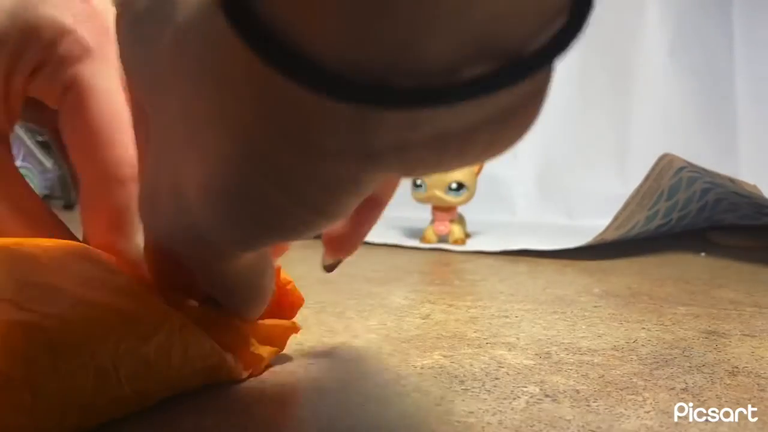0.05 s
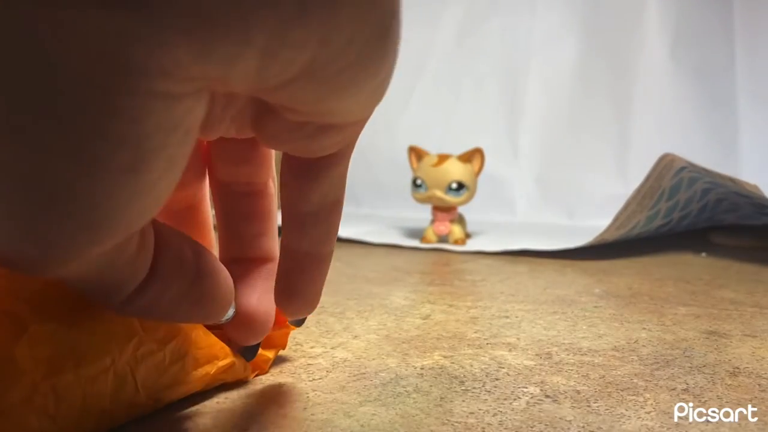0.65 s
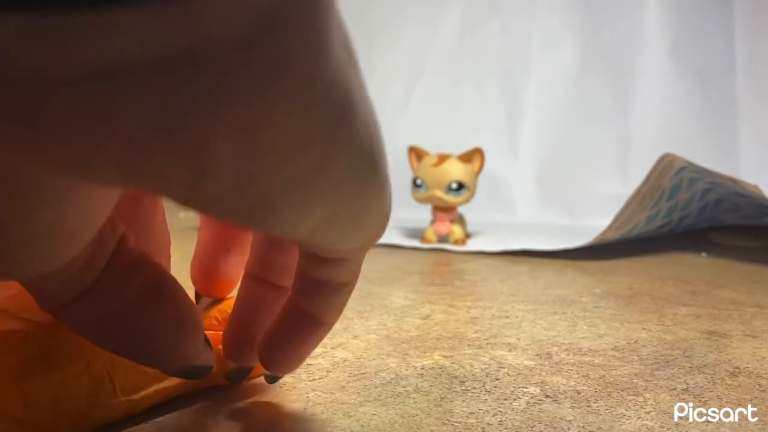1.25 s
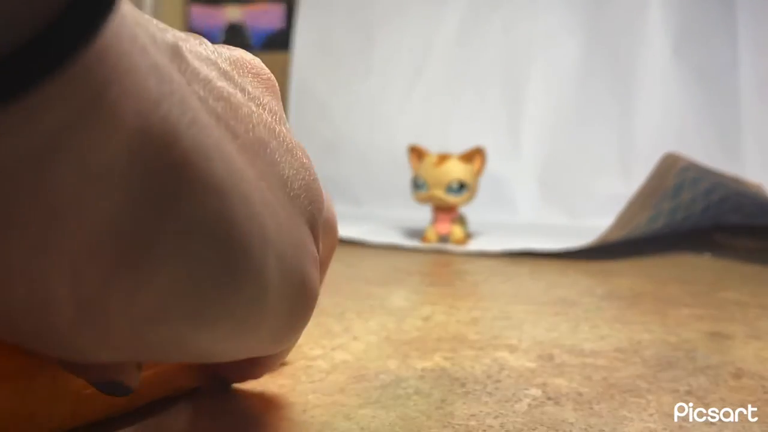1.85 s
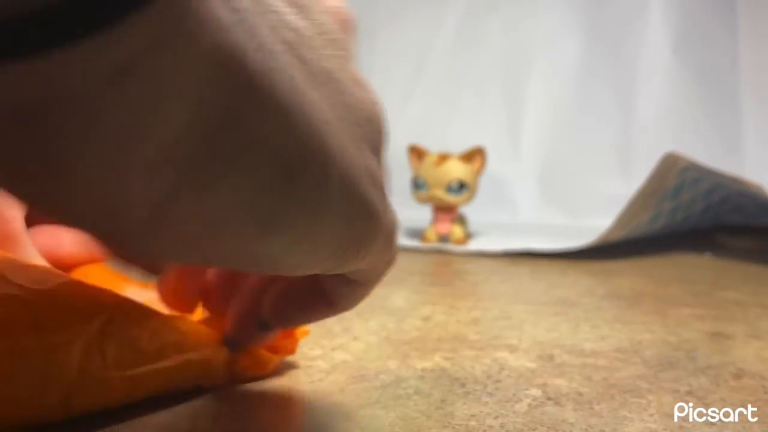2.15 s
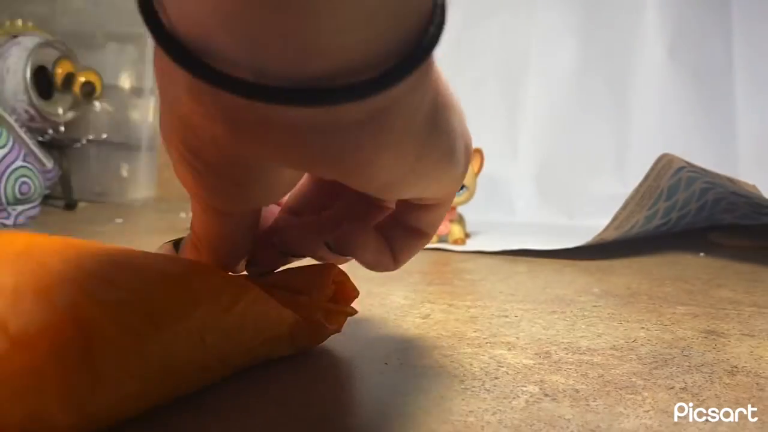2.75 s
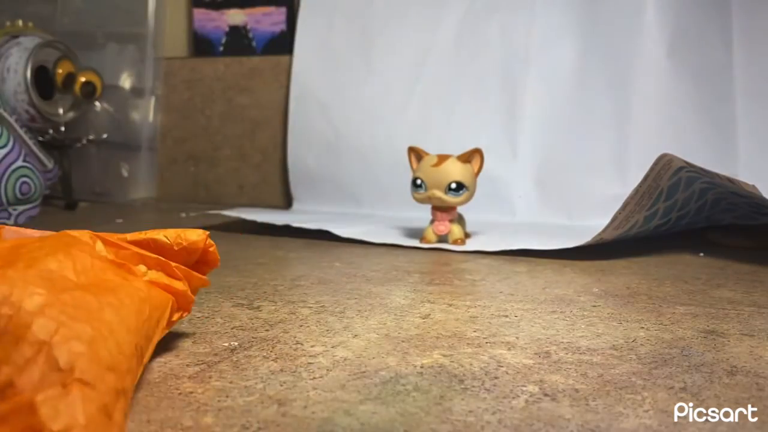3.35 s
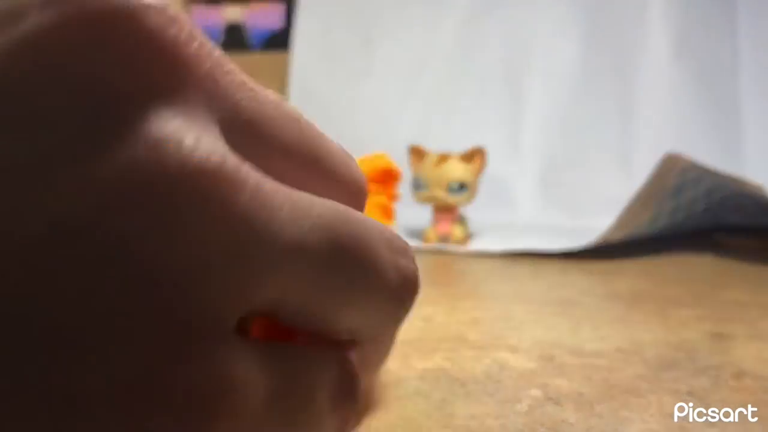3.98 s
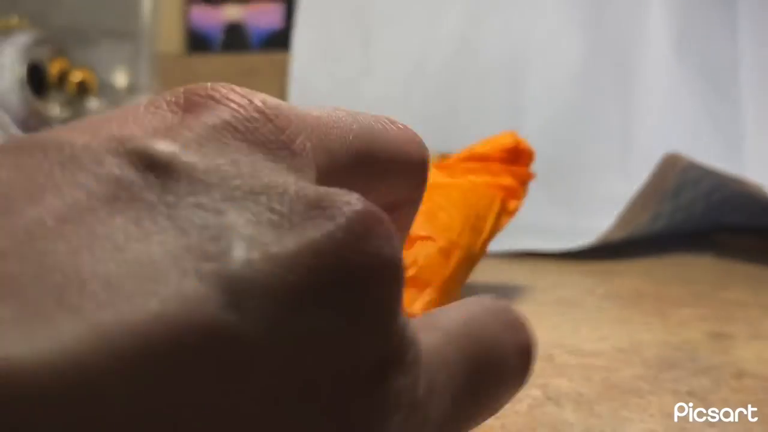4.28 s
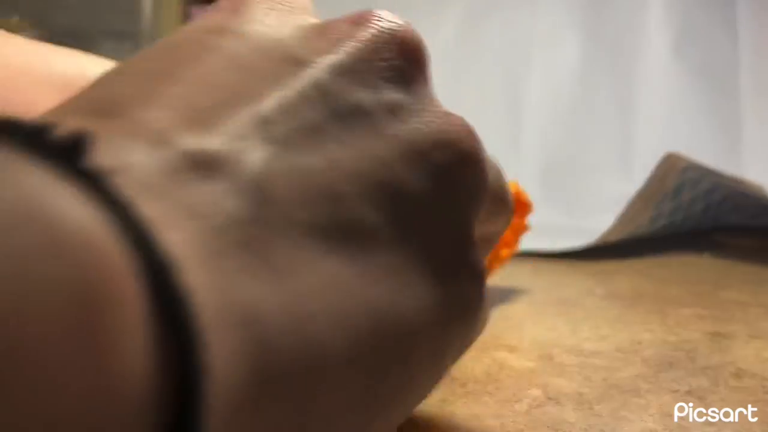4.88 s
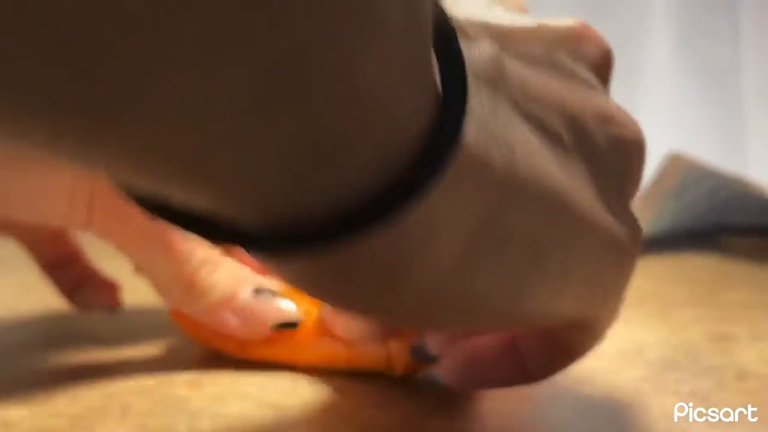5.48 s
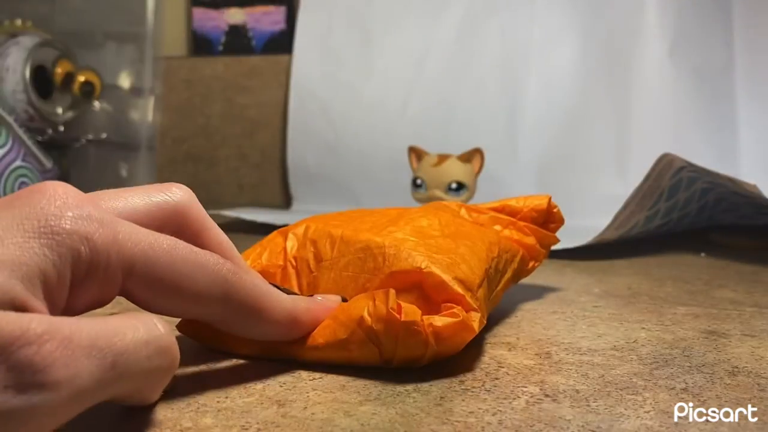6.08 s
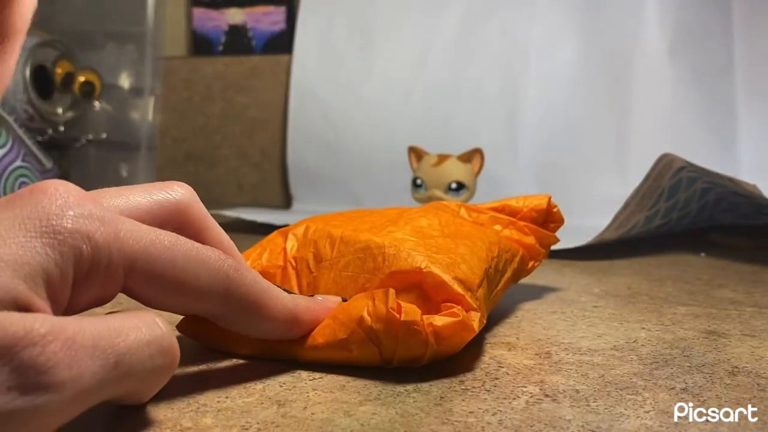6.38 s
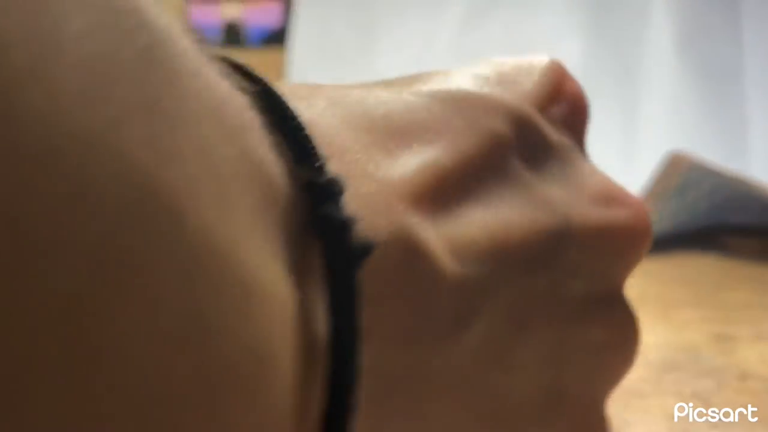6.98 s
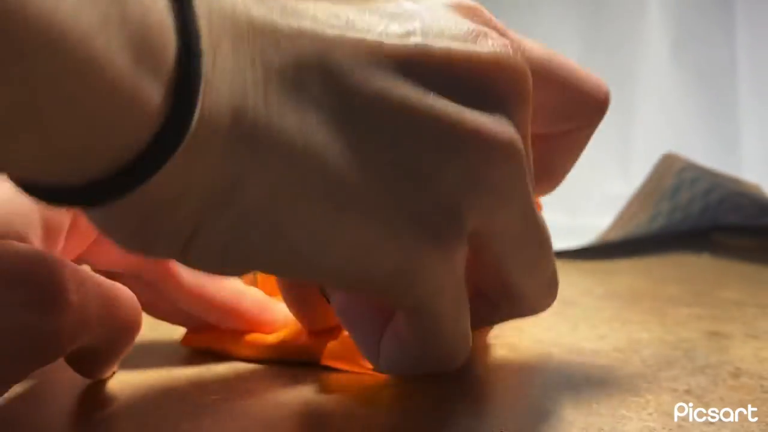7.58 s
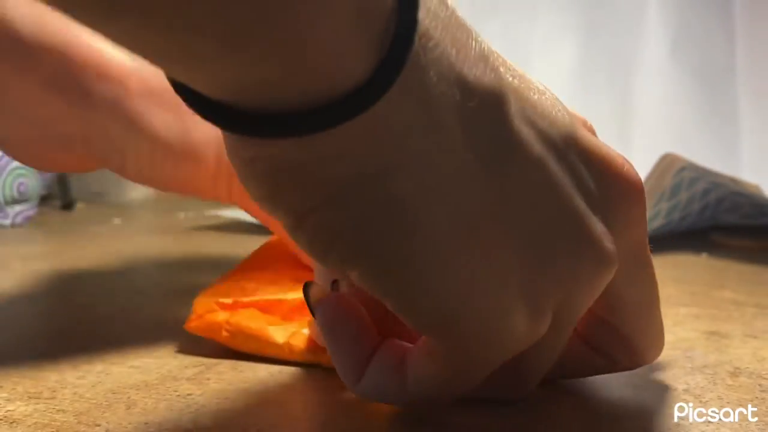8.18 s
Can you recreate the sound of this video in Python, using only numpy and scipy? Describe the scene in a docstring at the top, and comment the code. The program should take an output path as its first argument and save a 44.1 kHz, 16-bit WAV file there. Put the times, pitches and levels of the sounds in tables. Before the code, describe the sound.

Close by, hands fold tissue paper round a small parcel on a table, making uneven hissing rustles and bursts of crinkling. A hard knock, sharp nail taps and soft fingertip thuds come near the start. The rustling swells as the parcel slides round with a light scrape. After a brief lull with another knock and two taps, the folding resumes. A faint electric hum lies underneath.

```python
"""Folding tissue paper round a parcel

Close by, hands fold tissue paper round a small parcel on a table. The paper hisses by friction under
the fingers, buckles in bursts of tiny creases and now and then squeaks on itself. Something hard knocks,
fingertips thud on the tabletop, nails strike through the paper, and the parcel is slid round once.
A low electric hum lies under it all."""
import sys
import numpy as np
from scipy import signal
from scipy.fft import rfft, irfft, next_fast_len
from scipy.io import wavfile
from scipy.ndimage import uniform_filter1d, map_coordinates

SR = 44100
rng = np.random.default_rng(int(sys.argv[2]) if len(sys.argv) > 2 else 0)


def unload_wav(signal):
    """Save mono or channel-first audio to the path in sys.argv[1] as 16-bit WAV at rate SR, clipped to [-1, 1]."""
    wavfile.write(
        sys.argv[1],
        SR,
        np.round(np.clip(np.atleast_2d(signal).T, -1, 1) * 32767).astype(np.int16),
    )


N = 362943
TIME = np.arange(N) / SR


def amp(db):
    """Amplitude ratio of a level in decibels."""
    return 10 ** (np.asarray(db) / 20)


def unit(x):
    """Normalisation to rms 1."""
    return x / np.sqrt(np.mean(x ** 2) + 1e-20)


def along(points, hz):
    """Interpolation of (f/Hz, value) points on a logarithmic frequency axis."""
    f, value = np.transpose(points)
    return np.interp(np.log(hz + 1), np.log(f + 1), value)


def wobble(knots_per_s):
    """Slow random modulation: a spline through Gaussian values."""
    knots = rng.standard_normal(int(N * knots_per_s / SR) + 4)
    return map_coordinates(knots, [TIME * knots_per_s])


def filtered(x, response):
    """Linear filtering: the spectrum of x times a complex frequency response."""
    size = next_fast_len(N + 8192)
    return irfft(rfft(x, size) * response(np.fft.rfftfreq(size, 1 / SR)), size)[..., :N]


def coloured(x, spectrum):
    """Spectral shaping by (f/Hz, level/dB) points, at rms 1."""
    return unit(filtered(x, lambda hz: amp(along(spectrum, hz))))


def resonant(x, modes):
    """Modal superposition: x drives damped resonators of alternating sign, at rms 1."""
    def response(f):
        return sum((-1) ** k * amp(db) * 1j * f * width / (centre * centre - f * f + 1j * f * width)
                   for k, (centre, width, db) in enumerate(modes))
    return unit(filtered(x, response))


def swells(rows, exponent, tail=1):
    """Envelope of bursts (t/s, half length/s, level/dB) added in power; tail stretches each decay."""
    power = np.zeros(N)
    for t, half, db in rows:
        near = slice(max(int((t - .15) * SR), 0), int((t + .15) * SR))
        age = (TIME[near] - t) / half
        power[near] += (amp(db) * np.exp(-np.maximum(age / tail, -age * tail) ** exponent)) ** 2
    return np.sqrt(power)


# finger strokes; tension raises the hiss, body adds low rustle, weight deepens that rustle:
# start/s, end/s, level/dB, tension/dB, body/dB, weight/dB
FINGER_STROKES = [(0, 0.19, -42.5, 0, -8.5, -1.5), (0.261, 0.326, -48.5, 0.5, -9, 2),
                  (0.529, 0.713, -51, 4, -3.5, -2), (1.215, 1.655, -50, -2, -4.5, -0.5),
                  (1.69, 2.141, -46, -3.5, -6.5, 2.5), (2.185, 2.376, -50.5, 0, -7.5, -1.5),
                  (2.42, 2.622, -48, -0.5, -4.5, 0), (2.768, 3.188, -41, 2, -7.5, -0.5),
                  (3.232, 3.676, -43.5, 1, -7, 1), (3.697, 4.224, -41, 4, -7.5, -4),
                  (4.257, 4.5, -48.5, 4.5, -8, 1), (4.528, 4.742, -42.5, 4, -7.5, -5),
                  (4.747, 5.266, -40.5, 1, -4.5, -9.5), (5.346, 5.564, -44, 3, -5.5, -9),
                  (5.608, 5.798, -52.5, 0.5, -3, -13), (5.856, 6.065, -61, 0.5, -1.5, 5),
                  (6.557, 6.811, -51.5, 1, -5, -12), (6.975, 7.222, -54.5, 3.5, -4, -4),
                  (7.26, 7.51, -57.5, -1.5, -2.5, -9), (7.591, 7.745, -51.5, 1.5, -1.5, -10),
                  (7.885, 8.218, -47.5, -2.5, -2, -3.5)]
RESTING_DB = -76  # faint hiss under a still hand


def rubbing(attack_s=0.012, release_s=0.022):
    """Envelope of sliding friction: each stroke rises exponentially, holds and decays."""
    power = np.zeros(N)
    for start, end, db, *_ in FINGER_STROKES:
        rise = np.minimum((TIME - start) / attack_s, 0)
        fall = np.maximum((TIME - end) / release_s, 0)
        power += (amp(db) * np.exp(rise - fall)) ** 2
    return np.sqrt(power + amp(RESTING_DB) ** 2)


def grip():
    """Loading of the sheet: tension, body and weight hold through a stroke, then glide to the next."""
    corners = sorted((t, *hold) for start, end, _, *hold in FINGER_STROKES for t in (start, end))
    times, *columns = np.transpose(corners)
    return [np.interp(TIME, times, column) for column in columns]


def buckling(rub, per_second=14, half_s=0.0065, growth=0.36):
    """Envelope of random buckling; it grows more slowly than friction, so firm strokes sound smoother."""
    when, length, strength = rng.random((int(per_second * N / SR), 3)).T
    levels_db = -50 + 4.5 * (2 * strength - 1)
    folds = swells(zip(when * N / SR, half_s * (.5 + length), levels_db), exponent=1.8, tail=1.4)
    moving = np.maximum(rub - amp(RESTING_DB), 0)
    return folds * unit(moving) ** growth


def creases(per_second, spread_db, samples=160):
    """Buckling fibres radiate a dense train of short wave packets, each at its own frequency."""
    when, pitch, strength, phase = rng.random((int(per_second * N / SR), 4)).T
    hz = 100 + 15800 * pitch
    age = np.arange(samples) / SR
    gain = amp(-spread_db * np.log(np.maximum(strength, .02)))
    tones = np.sin(2 * np.pi * (hz[:, None] * age + phase[:, None]))
    packets = gain[:, None] * tones * np.hanning(samples)
    positions = (when * N).astype(int)[:, None] + np.arange(samples)
    return unit(np.bincount(positions.ravel(), packets.ravel(), N)[:N])


def patchy(x, depth_db):
    """Time-varying filtering: as the sheet changes shape, its resonances come and go."""
    spectra = signal.stft(x, nperseg=1024)[2]
    field = uniform_filter1d(rng.standard_normal(spectra.shape), size=5, axis=0)
    field = uniform_filter1d(field, size=6, axis=1)
    return unit(signal.istft(spectra * amp(depth_db * unit(field)), nperseg=1024)[1][:N])


def rustle():
    """Superposition of creases and the friction noise of sliding fibres, at rms 1."""
    fibres = creases(per_second=3000, spread_db=1) + amp(5.5) * rng.standard_normal(N)
    return patchy(fibres, depth_db=2.0)


def spread(x, side_db, left_db):
    """Decorrelation: noise in antiphase widens x, and unequal channel levels lean it to the left."""
    side = amp(side_db) * patchy(rng.standard_normal(N), depth_db=-1.0)
    return np.array([x + side, x - side]) * amp([[left_db], [-left_db]])


# prominent folds; a soft one has more body and less treble: t/s, half length/s, level/dB, softness/dB
PAPER_FOLDS = [(0.04, 0.015, -34.5, -5), (0.12, 0.022, -37.5, 0.5), (0.366, 0.0072, -44, 0.5),
               (0.416, 0.018, -49.5, 4), (0.477, 0.025, -52, 3), (.638, .009, -36.5, -9),
               (.712, 0.0072, -50, -7), (0.788, 0.0074, -54.5, -14), (0.917, 0.018, -51, -2),
               (0.99, 0.0056, -42, -10), (1.098, 0.02, -48.5, -9), (1.157, 0.022, -40, -10.5),
               (1.26, 0.04, -45, 2), (1.313, .015, -45.5, 2), (1.397, 0.016, -41, 4),
               (1.439, 0.03, -42, -2), (1.538, 0.0041, -42, -5), (1.623, 0.0086, -41, -11),
               (1.696, .0175, -42.5, -10), (1.783, .035, -38.5, 2), (1.89, 0.015, -32, 1.5),
               (1.961, 0.016, -42, 4.5), (2.011, .01, -40, -1), (2.104, 0.014, -38.5, 0),
               (2.229, .016, -49.5, -16), (2.285, 0.015, -44, 5), (2.347, 0.013, -35.5, 4.5),
               (2.435, 0.015, -44, 4), (2.586, 0.013, -44.5, 2), (2.689, 0.015, -48.5, 5),
               (2.784, 0.023, -31, 3.5), (2.815, 0.021, -31, 1.5), (2.919, 0.0058, -35.5, 5.5),
               (2.961, 0.036, -32, -3), (3.1, .0145, -34, -5), (3.255, 0.02, -37.5, -3),
               (3.293, 0.033, -33.5, -0.5), (3.409, 0.041, -36.5, 1), (3.58, 0.013, -42, -4),
               (3.857, .0215, -38, -1), (3.956, 0.0096, -37.5, 2), (4.041, 0.021, -35, -4),
               (4.152, 0.0074, -36, 0), (4.208, 0.016, -39, -12), (4.404, 0.011, -44.5, -3),
               (4.776, 0.016, -39.5, -0.5), (4.815, 0.0062, -37, 9.5), (4.927, 0.015, -43, 1),
               (5.512, 0.013, -42.5, -13), (5.565, 0.016, -40, 8.5), (5.673, 0.013, -43.5, -1),
               (5.734, .025, -40, -0.5), (5.786, 0.0087, -46.5, 6.5), (5.867, .006, -52, 1.5),
               (5.967, 0.029, -48, -5), (6.271, 0.014, -50.5, -1.5), (6.306, 0.01, -50.5, -4),
               (6.616, 0.0079, -40, 6), (6.674, 0.016, -40, 1.5), (6.764, 0.0053, -44, -10),
               (6.936, 0.016, -40, -1), (7.025, 0.033, -48.5, 8), (7.076, 0.013, -49, -7),
               (7.185, 0.034, -43.5, -6), (7.274, 0.012, -47.5, 4), (7.347, 0.016, -53, 10),
               (7.426, 0.018, -46, -11), (7.485, 0.009, -41.5, -8), (7.657, 0.0093, -44, 4),
               (7.715, 0.012, -41.5, -5), (7.766, 0.015, -45, -15), (7.881, 0.019, -39, -0.5),
               (7.935, 0.05, -40.5, -0.5), (8.128, 0.019, -34.5, 3)]
# spectral densities of the sheet's five registers: f/Hz, level/dB
DEEP_SPECTRUM = [(40, -3.5), (130, -4.5), (250, 2), (430, 0), (600, 0), (1000, -52)]
BODY_SPECTRUM = [(250, -39), (430, -17), (560, -4), (850, 1.5), (1150, 1), (1600, -0.5), (1850, -6),
                 (3000, -60)]
SLACK_SPECTRUM = [(900, -7), (1500, -17), (1850, -2.5), (2200, 2), (2650, 5.5), (3000, 4), (3300, -10.5),
                  (4500, -57.5)]
TAUT_SPECTRUM = [(2400, -54), (3200, -5), (3550, 1.5), (4300, 2), (5000, 0.5), (7200, -0.5), (7900, -9),
                 (10000, -50)]
TREBLE_SPECTRUM = [(5500, -79), (7100, -12.5), (7700, -4.5), (9000, 4.5), (11000, -.5), (13000, -1),
                   (15800, -3)]


def paper(uneven_db=1.5, treble_per_tension=0.66, treble_per_softness=-0.37):
    """Source and filter: friction, folds and snaps excite the sheet; the grip weights its registers."""
    tension, body, weight = grip()
    rub, snap = rubbing(), snaps()
    handling = np.hypot(rub * amp(uneven_db * wobble(22)), buckling(rub))
    t, half, peak, softness = np.transpose(PAPER_FOLDS)

    def force(fold_db):
        return np.hypot(handling, swells(zip(t, half, peak + fold_db), exponent=1.56, tail=1.04))

    low_force = np.hypot(amp(body) * force(softness), amp(-14) * snap)
    crisp_force = np.hypot(force(0), amp(-9) * snap)
    treble_gain = amp(-3.5 + treble_per_tension * tension)
    treble_force = np.hypot(treble_gain * force(treble_per_softness * softness), snap)
    grain = rustle()
    # the low rustle spreads over the table and reaches the two channels differently
    low = amp(weight - 6) * coloured(spread(rustle(), side_db=-12.5, left_db=2.5), DEEP_SPECTRUM)
    low += amp(-2.5) * coloured(spread(grain, side_db=-1.5, left_db=3.0), BODY_SPECTRUM)
    # tension moves the energy from the slack register to the taut one
    taut_ratio = amp(tension + 3)
    slack = coloured(spread(grain, side_db=-60, left_db=0.13), SLACK_SPECTRUM)
    crisp = (slack + taut_ratio * coloured(grain, TAUT_SPECTRUM)) / np.hypot(1, taut_ratio)
    treble = amp(1) * coloured(grain, TREBLE_SPECTRUM)
    return low_force * low + crisp_force * crisp + treble_force * treble


# partials of the electric hum: f/Hz, level/dB, wavering/dB
HUM_PARTIALS = [(59.2, -53.5, 1.5), (119.2, -60, 1.8)]
# spectral density of the room's rumble: f/Hz, level/dB
RUMBLE_SPECTRUM = [(20, -38), (35, -15.5), (55, -0.5), (75, -5.5), (110, -12), (170, -20.5), (300, -23),
                   (1000, -31.5), (4000, -45), (15000, -47)]


def room(rumble_db=-56.5):
    """Slow amplitude and phase modulation make an electric hum throb over a quiet rumble."""
    hum = np.zeros(N)
    for hz, db, waver_db in HUM_PARTIALS:
        throb = amp(waver_db * wobble(6.5))
        hum += amp(db) * unit(throb * np.sin(2 * np.pi * hz * TIME + 0.22 * wobble(5.1)))
    return hum + amp(rumble_db) * coloured(rng.standard_normal(N), RUMBLE_SPECTRUM)


# hard knocks on the table: t/s, half length/s, level/dB
HARD_KNOCKS = [(.541, 0.01, -24.5), (6.0, 0.0097, -28), (7.335, 0.0063, -38), (7.363, 0.0082, -45)]
# resonances of the hard object: f/Hz, bandwidth/Hz, level/dB
KNOCK_MODES = [(1285, 196, 2), (1940, 280, -3), (2800, 300, -12), (4200, 810, -13.5), (7500, 9600, -26)]


def knocks(left_db=1.0, ring_db=-1):
    """Impact excitation: a hard object chatters on the table; its lowest mode rings wide and leftward."""
    centre = resonant(rng.standard_normal(N), KNOCK_MODES)
    lowest = KNOCK_MODES[:1]
    ring = amp(ring_db) * resonant(resonant(rng.standard_normal((2, N)), lowest), lowest)
    return swells(HARD_KNOCKS, exponent=1.7) * unit(centre + ring * amp([[left_db], [-left_db]]))


# fingertips pressing on the table: t/s, half length/s, level/dB
FINGERTIP_THUDS = [(0.547, 0.0075, -40), (0.658, 0.017, -34), (0.729, 0.0266, -47.5), (1.016, 0.0223, -28),
                   (1.237, 0.016, -45.5), (1.675, 0.0071, -43.5), (1.853, 0.013, -39),
                   (1.931, 0.0157, -42.5), (2.786, 0.0166, -48), (3.29, 0.017, -48), (4.49, 0.01, -44),
                   (5.877, 0.0136, -45.5), (6, 0.028, -40), (6.122, 0.0094, -45.5), (6.439, 0.02, -34.5),
                   (8.129, 0.025, -54.5)]
# modes of the tabletop: f/Hz, level/dB
TABLETOP_MODES = [(92, -10), (120, 3.5), (155, -8.5), (186, -4), (235, -14), (285, -16.5)]


def thuds(detune=0.064):
    """A soft impact excites the low modes of the tabletop, detuned a little by the load of the hand."""
    out = np.zeros(N)
    for t, half, db in FINGERTIP_THUDS:
        near = slice(int((t - .1) * SR), int((t + .1) * SR))
        age = TIME[near] - t
        ring = np.zeros_like(age)
        for hz, mode_db in TABLETOP_MODES:
            loaded_hz = hz * (1 + detune * rng.normal())
            ring += amp(mode_db) * np.sin(2 * np.pi * (loaded_hz * age + rng.random()))
        out[near] += unit(ring) * swells([(t, half, db)], exponent=1.63)[near]
    return out


# nails striking through the paper: t/s, half length/s, scuff lead/s, snap level/dB, ring level/dB
NAIL_STRIKES = [(0.658, 0.011, 0.016, -24, -26), (1.008, 0.01, 0.019, -19.5, -31.5),
                (6.111, .01, 0.0036, -28.5, -46), (6.448, 0.0072, 0.026, -23.5, -23.5)]


def snaps(scuff_half_s=0.013, scuff_db=-15):
    """Envelope of friction, then impact: a nail drags over the paper just before it strikes."""
    scuffs = [(t - lead, scuff_half_s, db + scuff_db) for t, _, lead, db, _ in NAIL_STRIKES]
    strikes = [(t, half, db) for t, half, _, db, _ in NAIL_STRIKES]
    return swells(scuffs + strikes, exponent=1.3)


# joint resonances of nail, paper and table: f/Hz, bandwidth/Hz, level/dB
NAIL_MODES = [(927, 64, -6), (1824, 39, -8), (2320, 170, 1.5), (2835, 50, 1), (3400, 69, 2),
              (4220, 140, -4), (5100, 78, -10), (6420, 89, 1), (7150, 120, -20), (10000, 950, 1)]


def nail_taps():
    """Resonance after impact: nail, paper and table ring together for a moment."""
    envelope = swells([(t, half, db) for t, half, *_, db in NAIL_STRIKES], exponent=1.12)
    return envelope * resonant(rng.standard_normal(N), NAIL_MODES)


# paper squeaking on paper: t/s, half length/s, level/dB, f/Hz
PAPER_SQUEAKS = [(1.535, 0.01, -40, 2520), (5.217, 0.011, -34.5, 5950), (5.925, 0.023, -50.5, 1330),
                 (7.078, 0.0098, -44, 3500), (7.818, 0.0061, -54, 3120)]


def squeaks(width_hz=700):
    """Stick-slip friction between layers of paper sounds in a narrow band of frequency."""
    out = np.zeros(N)
    samples = SR // 4
    hz = np.fft.rfftfreq(samples, 1 / SR)
    for t, half, db, centre_hz in PAPER_SQUEAKS:
        band = np.exp(-((hz - centre_hz) / width_hz) ** 2)
        slip = unit(irfft(rfft(rng.standard_normal(samples)) * band))
        start = int(t * SR) - len(slip) // 2
        near = slice(start, start + len(slip))
        out[near] += slip * swells([(t, half, db)], exponent=1.5)[near]
    return out


# shoves that slide the parcel round: t/s, half length/s, level/dB
PARCEL_SHOVES = [(2.8, 0.034, -40), (2.955, 0.097, -37.5), (3.105, 0.035, -38), (3.255, .03, -38),
                 (3.42, 0.11, -42.5), (3.75, 0.085, -49.5)]
# resonances of the hollow parcel: f/Hz, bandwidth/Hz, level/dB
PARCEL_MODES = [(1910, 430, -1.2), (2610, 600, -0.93)]


def parcel_slide():
    """Forced vibration: friction on the table drives the resonances of the hollow parcel."""
    scrape = resonant(resonant(rng.standard_normal(N), PARCEL_MODES), PARCEL_MODES)
    return swells(PARCEL_SHOVES, exponent=1.35) * scrape


def scene():
    """Linear superposition of all sources, close and dry."""
    return paper() + nail_taps() + squeaks() + knocks() + parcel_slide() + thuds() + room()


# phase lag of the left channel behind the right: f/Hz, lag/half cycles
CHANNEL_LAG = [(60, 0), (300, -.16), (750, -.22), (1050, -.5), (1300, -.6), (1550, -.3), (1800, -.1),
               (2600, 0), (7500, 0), (8750, 1), (9450, 1), (10900, 2), (11400, 2), (12850, 3), (13600, 3),
               (14950, 4)]


def record(dry, top_hz=16050, edge_hz=300):
    """Interchannel phase lag widens the low middle and the treble; a low-pass limits the band."""
    def response(hz):
        phase = np.pi / 2 * np.array([[-1], [1]]) * along(CHANNEL_LAG, hz)
        return np.exp(1j * phase) * np.clip((top_hz - hz) / edge_hz, 0, 1)
    return filtered(dry, response)


dry = scene()
out = record(dry)
unload_wav(out)
```